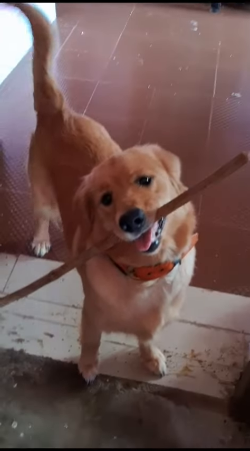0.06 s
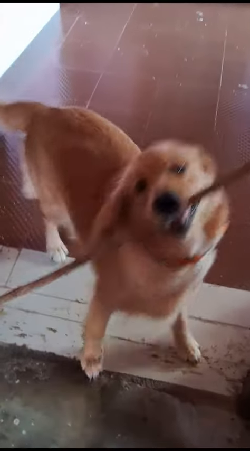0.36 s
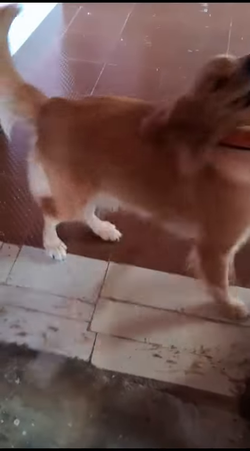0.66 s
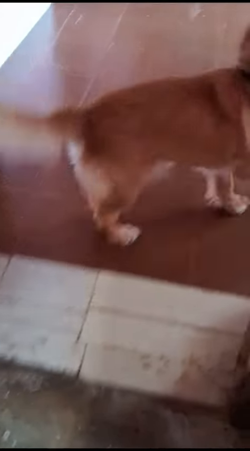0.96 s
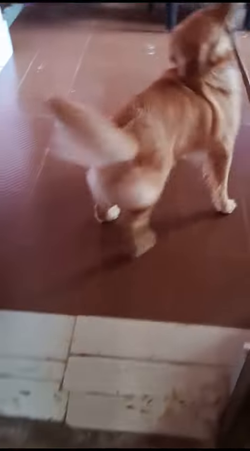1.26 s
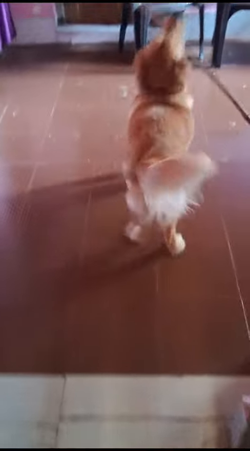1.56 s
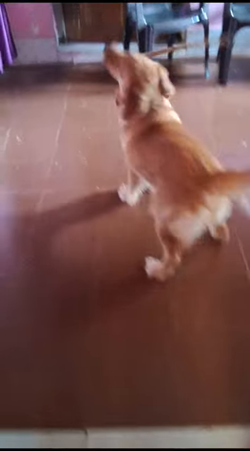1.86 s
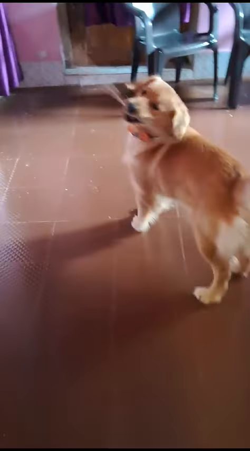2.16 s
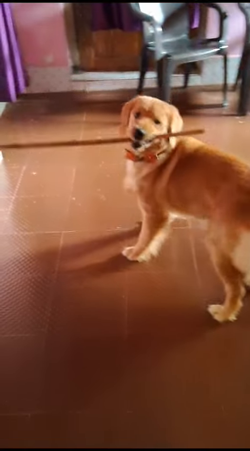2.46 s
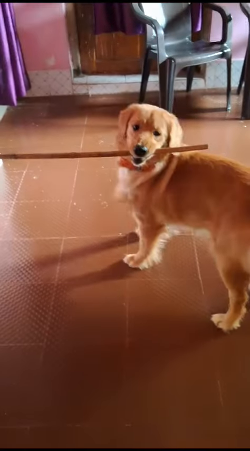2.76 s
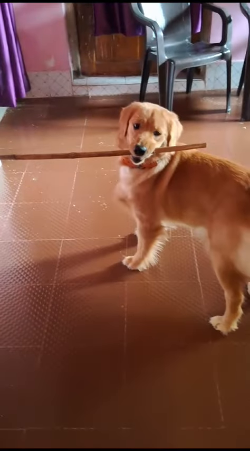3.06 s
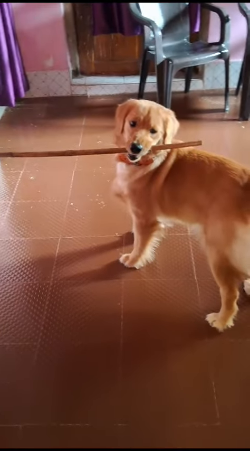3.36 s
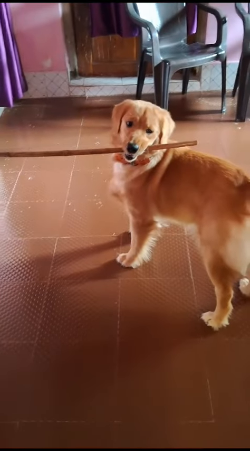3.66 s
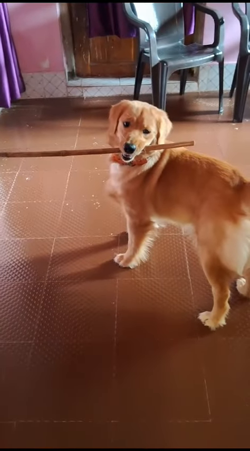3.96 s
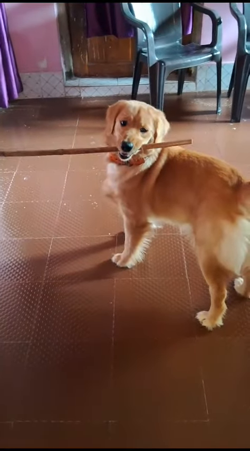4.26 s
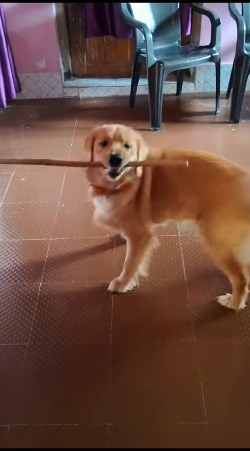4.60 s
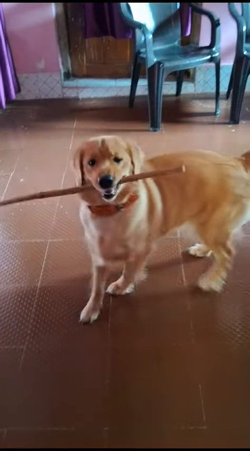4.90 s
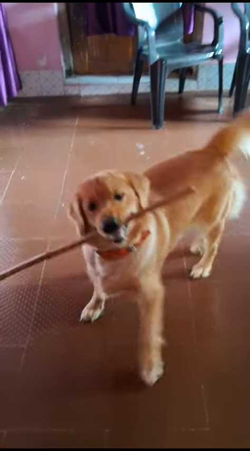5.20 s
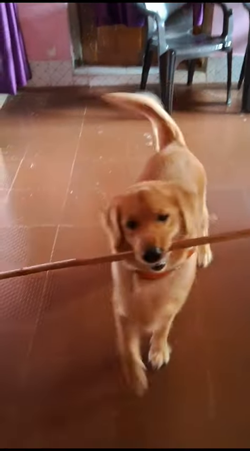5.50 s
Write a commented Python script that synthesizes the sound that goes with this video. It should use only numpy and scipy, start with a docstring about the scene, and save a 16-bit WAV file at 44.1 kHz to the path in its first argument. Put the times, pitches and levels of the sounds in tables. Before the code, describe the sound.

Two loud wooden knocks come early, the second a hollow, juddering bang, as a stick in a puppy's mouth hits hard things and furniture in a reverberant tiled room. Claws tick, a collar ring tinkles faintly and the stick taps again. After a pause with only tiny breaths and a faint steady whirr, the puppy approaches the microphone with soft footfalls, panting, rustling fur, teeth clicking on wood and another light knock.

```python
"""A long wooden stick, carried in a puppy's mouth, knocks on hard things in a bare tiled room.
Each impact excites the stick's damped modes; once it bangs into hollow furniture, whose panel resonates.
Teeth crack on the wood, the mouth clops, and soft breaths puff and pant among faint creaks of wood.
Claws tick, paws pad, paws and fur rustle, and friction makes the collar ring tinkle.
The room reverberates over a faint steady whirr."""
import sys
import numpy as np
from scipy import signal
from scipy.fft import rfft, irfft
from scipy.io import wavfile
from scipy.ndimage import uniform_filter1d

SR = 44100
rng = np.random.default_rng(int(sys.argv[2]) if len(sys.argv) > 2 else 0)


def generate_wav(signal):
    """Clip the signal to [-1, 1] and save it as 16-bit WAV at the path in sys.argv[1]."""
    frames = np.transpose(np.atleast_2d(signal))
    scaled = np.clip(frames, -1, 1) * 32767
    pcm = np.round(scaled).astype(np.int16)
    wavfile.write(sys.argv[1], SR, pcm)


N = 244314
SIZE, FFT_SIZE = 2 ** 15, 3 * 2 ** 14  # samples in one event, and in its convolution with the room
AGE = np.arange(SIZE) / SR  # seconds since an event began

# Spectrum of the background rush. Each row: frequency in Hz, relative spectral density in dB.
RUSH_SPECTRUM = [(30, -33.5), (64, -13.5), (120, -12), (200, -17), (300, -12.5), (450, -7.5), (600, -14.5),
                 (950, -15.5), (1400, -30.5), (2200, -31.5), (3000, -35.5), (4000, -42), (8000, -45),
                 (14000, -42)]
# Noise bands of the whirr. Each row: centre in Hz, width in Hz, level in dB.
WHIRR_BANDS = [(354, 22, -72), (410, 30, -72.5), (943, 20, -80.5)]
# Tones of the hum. Each row: frequency in Hz, level in dB.
HUM_TONES = [(269.2, -75), (454.8, -67)]
# Reverberation time of the room. Each row: frequency in Hz, time to fall 60 dB (T60) in seconds.
REVERB_TIMES = [(100, 0.59), (210, 0.52), (400, 0.62), (800, 0.63), (1840, 0.67), (4850, 0.64),
                (12800, 0.41)]
# Spectrum of the reflections. Each row: frequency in Hz, relative level in dB.
ROOM_SPECTRUM = [(100, 4.5), (300, -2), (1000, -2), (2500, -2), (5000, -2.5), (14000, -1)]
# Coherence of the diffuse field. Each row: frequency in Hz, left-right correlation.
COHERENCE = [(60, .9), (170, 0.77), (280, 0.98), (420, 0.52), (600, 0.16), (1000, 0.028), (3000, -0.0031),
             (14000, -0.59)]
# The puppy's path. Each row: time in seconds, distance from the microphones in metres.
DOG_DISTANCE = [(0.9, 0.9), (1.35, 2.7), (2.5, 1.76), (4.65, 1.51), (4.85, 1.29), (5.3, 0.92)]
# Tinks of the collar ring. Each row: middle in seconds, frequency in Hz, level in dB.
COLLAR_TINKS = [(0.696, 9900, -75), (0.789, 10500, -67), (0.86, 7510, -71), (1.288, 10500, -62.5),
                (1.337, 10360, -59), (1.992, 10140, -71.5), (2.236, 9220, -73.5), (2.236, 13900, -81),
                (2.245, 6820, -70.5), (2.64, 10500, -77)]
# Claws striking tile. Each row: start in seconds, level in dB, T60 of the scrape in seconds.
CLAW_TICKS = [(0.4, -52.5, 0.016), (0.431, -60, 0.014), (0.7036, -52, 0.019), (0.803, -62, 0.034),
              (1.635, -57, 0.049), (1.725, -53.5, 0.032), (2.4413, -60, .018), (2.734, -71, .06),
              (2.8, -67.5, 0.046), (4.567, -74, .03), (4.7571, -61, 0.013), (5.048, -58.5, 0.048),
              (5.132, -62.5, .035)]
# Soft footfalls. Each row: middle in seconds, level in dB.
FOOTFALLS = [(0.75, -58), (0.893, -56.5), (1.198, -57), (1.722, -55), (2.029, -68.5), (4.956, -48),
             (5.061, -51.5), (5.18, -53), (5.335, -51.5)]
# Soft panting and the rustle of paws and fur. Each row: middle in seconds, level in dB.
PANTS_AND_RUSTLES = [(0.282, -69), (0.438, -56.5), (0.55, -54), (0.83, -65), (0.897, -52.5), (4.624, -57),
                     (4.94, -42.5), (5.042, -52), (5.193, -53.5), (5.492, -52.5)]
# Broad rustle of paws and fur. Each row: frequency in Hz, relative spectral density in dB.
RUSTLE_SPECTRUM = [(300, 1), (1200, -3), (1700, -6), (2400, -6.5), (3400, -11), (4800, -12), (6500, -14.5),
                   (9000, -32.5), (15000, -14)]
# Breathy resonances of soft panting. Each row: centre in Hz, width in Hz, level in dB re the rustle.
PANTING_RESONANCES = [(1800, 200, -12.5), (2594, 760, -4)]
# Teeth cracking on wood. Each row: start in seconds, level in dB, top of the snap in Hz, T60 of the
# crunch in seconds, woody click in Hz, click in dB re the snap, ring in dB re the force, pan in dB.
TOOTH_CRACKS = [(2.5075, -53.5, 7000, 0.018, 1240, 3, -14, 22), (2.512, -51, 7300, 0.03, 1430, 6.5, -11, 8),
                (4.8018, -41.5, 15400, 0.01, 2120, 1, -1, -6),
                (4.8074, -47.5, 15800, 0.0037, 2790, -1, -7, 1),
                (4.82, -46.5, 15200, .03, 2420, -12, -6, 6), (4.928, -56, 14000, 0.028, 2880, 6, -6, 7),
                (5.305, -42.5, 15400, 0.13, 2030, 0, -7, -2)]
# Modes rung by a bite. Each row: frequency in Hz, relative level in dB, T60 in seconds.
BITE_MODES = [(3680, 3.5, 0.021), (5170, 7.5, 0.017), (6330, -5, 0.0097), (8370, 7.5, 0.016),
              (12900, 10, 0.0082)]
# Clops of the mouth shifting its grip. Each row: start in seconds, frequency in Hz, level in dB.
MOUTH_CLOPS = [(4.888, 481, -41.5), (4.910, 610, -48), (4.929, 425, -46.5), (5.056, 472, -47)]
# Soft puffs of the puppy's breath around the stick, among faint creaks of wood.
# Each row: middle in seconds, frequency in Hz, level in dB.
PUFFS_AND_CREAKS = [(0.28, 2800, -75), (0.45, 2300, -64.5), (0.54, 1950, -58), (0.579, 274.4, -54),
                    (0.85, 2730, -66.5), (0.895, 2730, -64), (2.959, 1650, -69.5), (2.96, 2464, -71.5),
                    (4.35, 2437, -77.5), (4.5, 1710, -73), (4.5, 2480, -69), (4.52, 3020, -73),
                    (4.631, 1743, -61.5), (4.951, 290, -46), (4.97, 2380, -51.5)]
# Modes of the furniture panel. Each row: frequency in Hz, relative level in dB, T60 in seconds.
PANEL_MODES = [(185.3, -3.5, 0.086), (231, -12, .07), (266, -3, 0.1), (348, -4.5, 0.06), (380, -4, 0.072),
               (431, -9.5, 0.2), (550, -8.5, 0.13), (660, -14.5, .18), (703.5, -12.5, 0.31),
               (767.6, -4, .2), (1013, -6, .18), (1370, -8, 0.11), (1806, -20.5, 0.16),
               (2200, -22.5, 0.077), (2610, -16.5, .14), (2960, -19.5, 0.116)]
# The stick meets the panel, then judders. Each row: start in seconds, level in dB, chatter T60 in seconds.
PANEL_IMPACTS = [(1.352, -27.5, .1), (1.388, -26.5, .12)]
# Modes of the stick held in the jaws. Each row: frequency in Hz, relative level in dB, T60 in seconds.
STICK_MODES = [(292.3, -13, 0.13), (556.5, -3.5, 0.06), (780, -4.5, 0.052), (926, -3, 0.075),
               (1238, -4.5, .09), (1334, -8.5, 0.12), (1615, -7, 0.09), (1995, -7, 0.07), (2406, -9, 0.076),
               (2530, -5, 0.05), (2799, -5, .03), (3315, -8, 0.029), (5440, -18.5, .012),
               (6300, -14, 0.012)]
# Knocks of the stick. Each row: start in seconds, levels of wood, clack, thud and crack in dB,
# top of wood and crack in Hz, centre and width of the clack in Hz, low edge of the thud in Hz,
# chatter T60 in seconds, factor by which the grip scales the mode frequencies, pan in dB.
STICK_KNOCKS = [(0.9302, -24.5, -28.5, -37.5, -42, 9000, 634, 380, 342, 0.022, 0.97, -2),
                (0.9328, -34, -41.5, -47, -38.5, 16080, 1970, 697, 293, 0.02, 1, -2),
                (1.351, -24, -41, -40, -29.5, 15800, 780, 457, 245, 0.046, 0.87, 4),
                (1.385, -33.5, -29.5, -29, -41.5, 6740, 810, 353, 237, 0.11, 0.77, 0.5),
                (2.165, -63.5, -64.5, -69, -81, 3300, 1328, 505, 134.5, 0.038, 0.91, -4),
                (2.479, -42, -42.5, -44, -54, 6300, 1260, 200.7, 158.5, 0.045, 0.96, -4),
                (5.2693, -39.5, -37.5, -39.5, -44.5, 6000, 927, 210, 120, 0.024, 0.72, -4),
                (5.305, -47.5, -42.5, -41.5, -50, 3020, 1310, 400, 138, 0.034, .92, -1)]


def from_db(db):
    """Amplitude grows tenfold for every 20 dB."""
    return 10 ** (np.asarray(db) / 20)


def unit_rms(x):
    """Power normalisation: the mean square becomes one."""
    return x / np.sqrt(np.mean(x ** 2) + 1e-30)


def burst(x):
    """Energy normalisation: a transient gets the energy of 0.1 s at unit power."""
    return x / np.sqrt(np.mean(np.sum(x ** 2, axis=-1)) * 10 / SR + 1e-30)


def at_hz(points, hz):
    """Interpolation on a logarithmic frequency axis."""
    frequencies, values = np.transpose(points)
    return np.interp(np.log(hz), np.log(frequencies), values)


def band(x, low_hz, high_hz, order=2):
    """Causal band-pass filtering."""
    high_hz = min(high_hz, .45 * SR)
    sos = signal.butter(order, [min(low_hz, high_hz - 1), high_hz], "band", fs=SR, output="sos")
    return signal.sosfilt(sos, x + 1e-18)


def whiten(x, bins=128):
    """Minimum-phase equalisation levels broad spectral humps and leaves the fine structure."""
    power = np.mean(np.abs(np.fft.fft(np.atleast_2d(x))) ** 2, axis=0)
    smoothed = uniform_filter1d(power, bins, mode="wrap")
    inverse = np.exp(-.5 * np.conj(signal.hilbert(np.log(smoothed + 1e-20))))
    return irfft(rfft(x) * inverse[:SIZE // 2 + 1])


def decay(t60):
    """Exponential damping: 60 dB are lost in t60 seconds."""
    return np.exp(-np.minimum(np.log(1000) * AGE / t60, 60))


def swell(rise_s):
    """A raised-cosine envelope peaks at rise_s and falls as it rose."""
    return np.sin(np.pi / 2 * np.minimum(AGE / rise_s, 2)) ** 2


def mode(force, hz, t60):
    """Forced response of a damped harmonic oscillator."""
    radius, angle = np.exp(-np.log(1000) / (t60 * SR)), 2 * np.pi * hz / SR
    return burst(signal.lfilter([1, 0, -1], [1, -2 * radius * np.cos(angle), radius ** 2], force + 1e-18))


def body(force, modes, pitch=1):
    """Modal superposition, with neighbouring modes in opposite sign."""
    return burst(sum((-1) ** k * from_db(db) * mode(force, hz * pitch, t60)
                     for k, (hz, db, t60) in enumerate(modes)))


def grains():
    """Broadband excitation: a dense train of tiny pulses of uneven size."""
    return unit_rms(rng.standard_normal(SIZE) * from_db(4 * np.minimum(rng.exponential(1, SIZE), 4)))


def contact(chatter_s, chatter_db):
    """An impact force is an impulse followed by decaying chatter."""
    impulse = burst(1. * (AGE == 0))
    chatter = burst(grains() * decay(chatter_s))
    return burst(whiten(impulse + from_db(chatter_db) * chatter))


def resonant_swell(hz, width_hz, rise_s):
    """Random excitation: a swell of grainy noise drives one narrow resonance."""
    return burst(band(grains() * swell(rise_s), hz - width_hz / 2, hz + width_hz / 2, order=1))


def diffuse(spectrum, size, t60s=None):
    """A diffuse field: half-octave stereo noise, coherent in the bass; t60s damps each band."""
    out, edges = 0, 31 * 2 ** np.arange(0, 9.6, .5)
    white = rng.standard_normal((2, 2, size))
    for k, (low, high) in enumerate(zip(edges, edges[1:])):
        mid, side = band(white[k % 2], low, high, order=3)
        hz = np.sqrt(low * high)
        alike = np.clip(at_hz(COHERENCE, hz), -1, 1)
        gain = from_db(at_hz(spectrum, hz)) * (decay(at_hz(t60s, hz)) if t60s else 1)
        out = out + gain * (np.sqrt(1 + alike) * mid + np.sqrt(1 - alike) * side * [[1], [-1]])
    return unit_rms(out)


def background(rush_db=-62.5, waver_depth_db=1.7):
    """Superposition of a dull rush, a narrow-band whirr and an amplitude-modulated hum."""
    whirr = hum = 0
    for hz, width, db in WHIRR_BANDS:
        noise = rng.standard_normal(N) + .5 * rng.standard_normal((2, N))
        whirr += from_db(db) * unit_rms(band(noise, hz - width / 2, hz + width / 2))
    waver_db = waver_depth_db * unit_rms(band(rng.standard_normal(N), low_hz=0.91, high_hz=12))
    for hz, db in HUM_TONES:
        tone = np.sin(2 * np.pi * (hz * np.arange(N) / SR + rng.random()))
        hum += from_db(db + waver_db) * unit_rms(tone)
    return from_db(rush_db) * diffuse(RUSH_SPECTRUM, N) + whirr + hum


def tiled_room(build_s=0.011, floor_delay_s=0.0015):
    """Reflection gives two transfer functions: direct sound with early echoes, and reverberation."""
    build_up = 1 - np.exp(-(AGE / build_s) ** 2)
    tail = whiten(diffuse(ROOM_SPECTRUM, SIZE, REVERB_TIMES) * build_up, bins=24)
    colour = from_db(at_hz(ROOM_SPECTRUM, np.maximum(np.fft.rfftfreq(FFT_SIZE, 1 / SR), 1)))
    reverb = from_db(0.5) * unit_rms(colour) * rfft(unit_rms(tail) / np.sqrt(SIZE), FFT_SIZE)
    early = diffuse(ROOM_SPECTRUM, SIZE) * decay(t60=0.041) * (AGE > floor_delay_s)
    near = from_db(1) * whiten((AGE == 0) + unit_rms(early) / np.sqrt(SIZE))
    return rfft(near, FFT_SIZE), reverb


def heard(sound, room, s, pan_db=0, facing_db=0, critical_distance_m=0.87):
    """Spherical spreading: direct sound falls as 1/distance, while reverberation keeps its level."""
    near, reverb = room
    distance_m = np.interp(s, *np.transpose(DOG_DISTANCE))
    direct = from_db(facing_db) * critical_distance_m / distance_m
    paths = direct * near * from_db([[pan_db / 2], [-pan_db / 2]]) + reverb  # positive pan is left
    return irfft(rfft(sound, FFT_SIZE) * paths, FFT_SIZE)


def add(out, s, sound):
    """Linear superposition of a stereo sound starting at s seconds."""
    i = max(round(s * SR), 0)
    out[:, i:i + sound.shape[1]] += sound[:, :N - i]


def collar(room, rise_s=0.021, hiss_db=-3):
    """Friction excites a high resonance of the small metal ring: thin, rough tinks in a little hiss."""
    out = np.zeros((2, N))
    for s, hz, db in COLLAR_TINKS:
        hiss = burst(band(grains() * swell(rise_s), 6000, 15500))
        tink = resonant_swell(hz, width_hz=240, rise_s=rise_s) + from_db(hiss_db) * hiss
        add(out, s - rise_s, heard(from_db(db) * tink, room, s, facing_db=3))
    return out


def paws_and_panting(room, pad_rise_s=0.074, pant_rise_s=0.093):
    """Hard contacts tick and soft ones thump; breathy resonances sound with rustling paws and fur."""
    out = np.zeros((2, N))
    for s, db, scrape_s in CLAW_TICKS:
        force = contact(scrape_s, 20 * np.log10(scrape_s / .009))  # at 9 ms, scrape equals impulse
        tick = burst(band(force, 3730, 19000))
        add(out, s, heard(from_db(db) * tick, room, s))
    for s, db in FOOTFALLS:
        thump = unit_rms(band(grains(), 44, 465)) * swell(pad_rise_s)
        add(out, s - pad_rise_s, heard(from_db(db) * thump, room, s))
    breathy_rustle = diffuse(RUSTLE_SPECTRUM, SIZE)[0]
    for hz, width, db in PANTING_RESONANCES:
        breathy_rustle += from_db(db) * unit_rms(band(grains(), hz - width / 2, hz + width / 2, order=1))
    breathy_rustle = unit_rms(breathy_rustle)
    for s, db in PANTS_AND_RUSTLES:
        pant_and_rustle = np.roll(breathy_rustle, rng.integers(SIZE)) * swell(pant_rise_s)
        roughness_db = 4 * np.clip(unit_rms(band(rng.standard_normal(SIZE), 40, 300)), -2, 2)
        pant_and_rustle *= unit_rms(from_db(roughness_db))
        add(out, s - pant_rise_s, heard(from_db(db) * pant_and_rustle, room, s, pan_db=-5.5))
    return out


def mouth(room, jaw_db=-13, puff_rise_s=.042):
    """Tooth impacts snap; resonance colours the clops, soft puffs of breath and faint creaks of wood."""
    out = np.zeros((2, N))
    for s, db, top_hz, crunch_s, click_hz, click_db, ring_db, pan_db in TOOTH_CRACKS:
        force = contact(crunch_s, chatter_db=33)
        snap = burst(band(force + from_db(ring_db) * body(force, BITE_MODES), 3450, top_hz))
        click_force = contact(crunch_s, 10 * np.log10(crunch_s / 0.0042))
        click = burst(band(click_force, click_hz / 1.395, click_hz * 1.37, order=3))
        jaw_knock = burst(band(contact(crunch_s, chatter_db=3), 417, 990))
        bite = snap + from_db(click_db) * (click + from_db(jaw_db) * jaw_knock)
        add(out, s, heard(from_db(db) * bite, room, s, pan_db, facing_db=0.5))
    for s, hz, db in MOUTH_CLOPS:
        clop = mode(contact(chatter_s=0.032, chatter_db=1.5), hz, t60=0.048)
        add(out, s, from_db(db) * burst(heard(clop, room, s)))
    for s, hz, db in PUFFS_AND_CREAKS:
        puff_or_creak = resonant_swell(hz, 0.046 * hz, puff_rise_s)
        add(out, s - puff_rise_s, heard(from_db(db) * puff_or_creak, room, s))
    return out


def furniture(room):
    """Forced vibration: the juddering stick drives the modes of a panel facing the microphones."""
    out = np.zeros((2, N))
    for s, hit_db, chatter_s in PANEL_IMPACTS:
        force = band(contact(chatter_s, chatter_db=13.5), 180, 6000, order=5)  # small panel: no deep bass
        for hz, db, t60 in PANEL_MODES:
            ringing = burst(heard(mode(force, hz, t60), room, s, facing_db=12))
            add(out, s, from_db(hit_db + db) * ringing)
    return out


def stick(room):
    """Impact excitation: the stick rings, the struck object clacks and thuds, the contact cracks."""
    out = np.zeros((2, N))
    for (s, wood_db, clack_db, thud_db, crack_db, top_hz,
         clack_hz, width_hz, thud_hz, chatter_s, pitch, pan_db) in STICK_KNOCKS:
        judder_db = 10 * np.log10(chatter_s / 0.02)  # longer chatter holds more of the energy
        dense_modes = burst(band(contact(chatter_s, judder_db + 15.5), 444, 3180, order=7))
        clear_modes = body(contact(chatter_s, judder_db - 3), STICK_MODES, pitch)
        wood = burst(band(clear_modes + from_db(1) * dense_modes, 260, top_hz))
        clack_force = contact(chatter_s, judder_db + 0.5)
        clack = burst(band(clack_force, clack_hz - width_hz / 2, clack_hz + width_hz / 2))
        thud = burst(band(contact(chatter_s * 2.6, judder_db + 3.5), thud_hz, 693, order=4))
        crack = burst(band(contact(chatter_s, judder_db + 11), 1760, 6700, order=1))
        crack = burst(band(crack, 340, top_hz, order=8))
        knock = from_db(wood_db) * wood + from_db(thud_db) * thud
        surface = from_db(clack_db) * clack + from_db(crack_db) * crack
        add(out, s, heard(knock, room, s, pan_db))
        add(out, s, heard(surface, room, s, pan_db, facing_db=0.5))
    return out


def scene():
    """Sound pressures add: the puppy's sounds share one room, over the steady background."""
    room = tiled_room()
    puppy = stick(room) + furniture(room) + mouth(room) + paws_and_panting(room) + collar(room)
    return puppy + background()


def record(dry, cutoff_hz=16000):
    """Microphone frequency response: the left is warmer, the right brighter, and both are low-passed."""
    left, right = dry
    left = left + 0.27 * band(left, 117, 220, order=1) - 0.075 * band(left, 1682, 3600, order=1)
    right = right + 0.29 * band(right, 1710, 3600, order=1)
    low_pass = signal.ellip(10, .1, 80, cutoff_hz, fs=SR, output="sos")
    return signal.sosfilt(low_pass, np.array([left, right]))


dry = scene()
out = record(dry)
generate_wav(out)
```